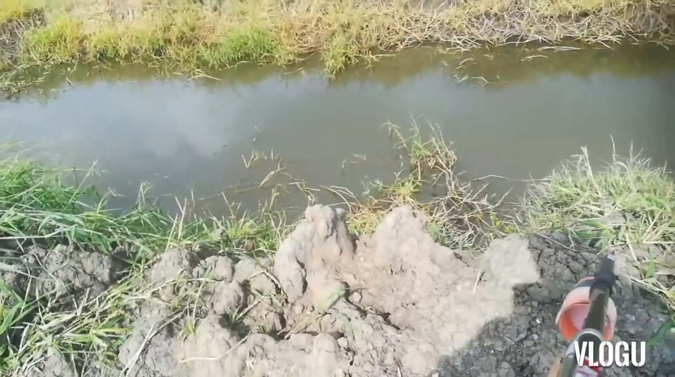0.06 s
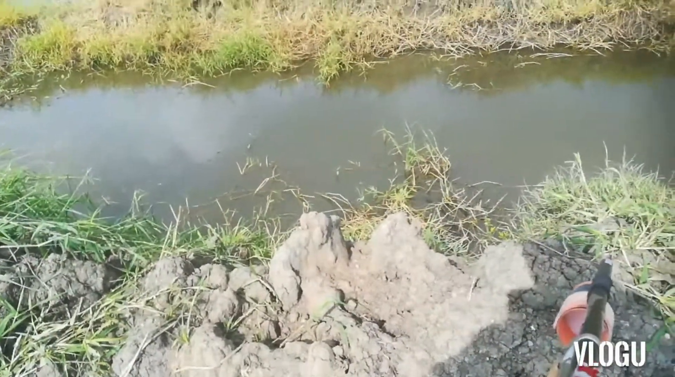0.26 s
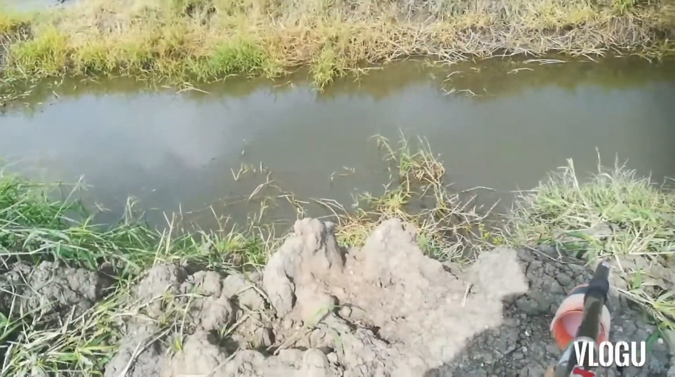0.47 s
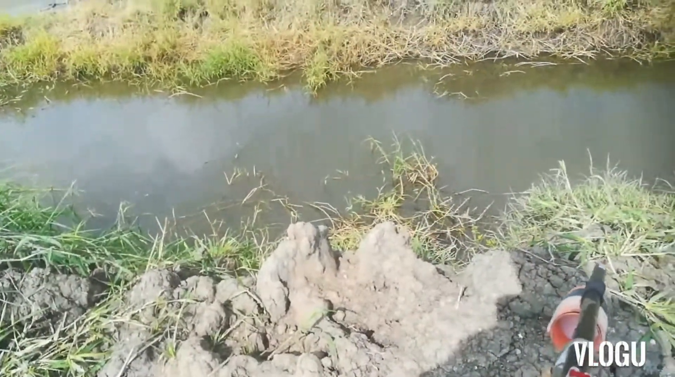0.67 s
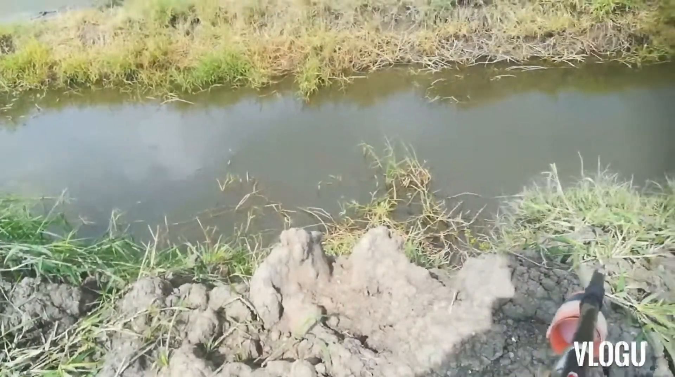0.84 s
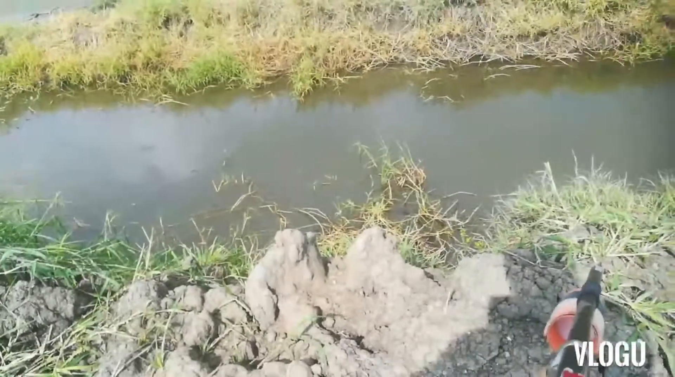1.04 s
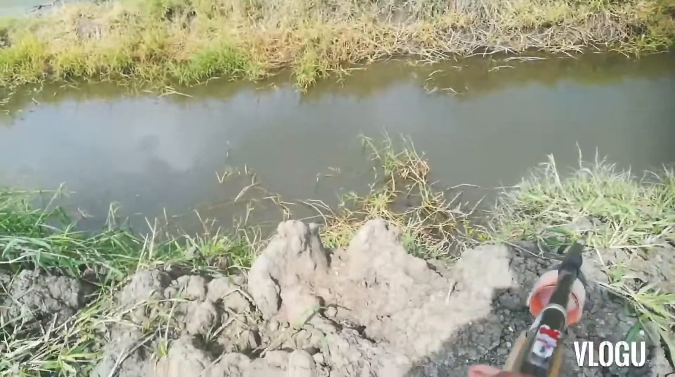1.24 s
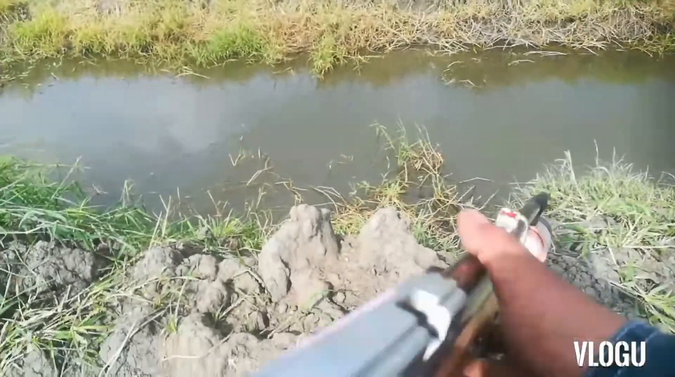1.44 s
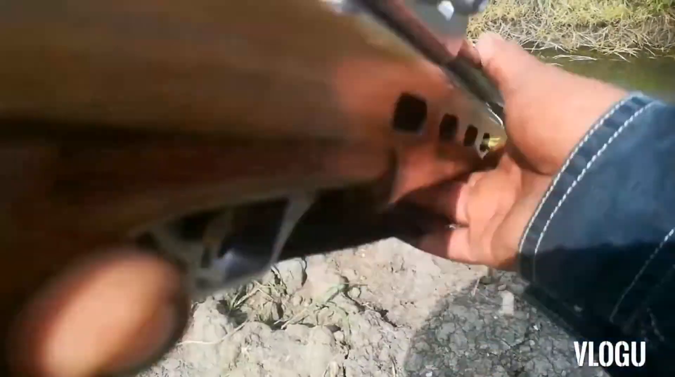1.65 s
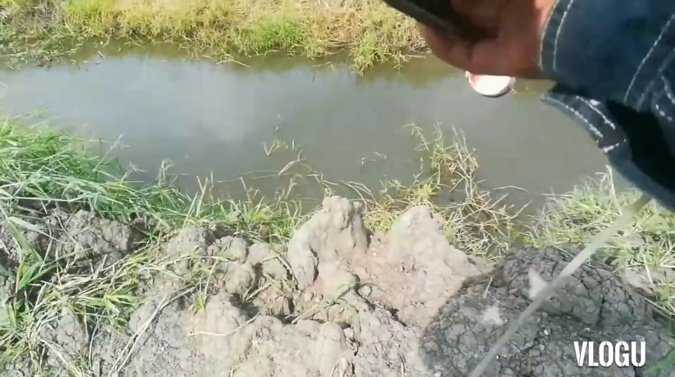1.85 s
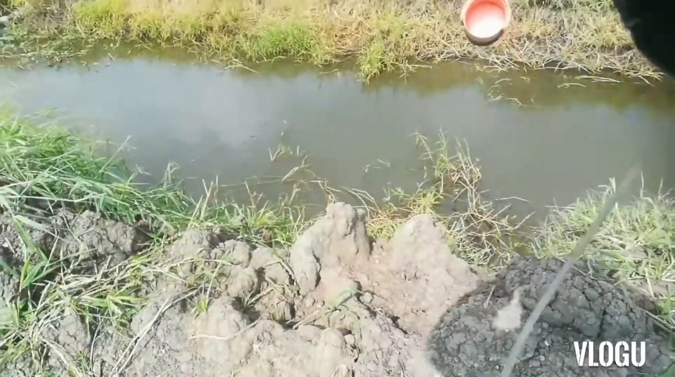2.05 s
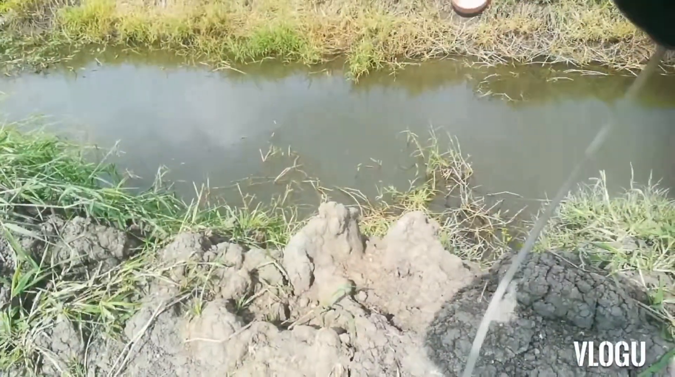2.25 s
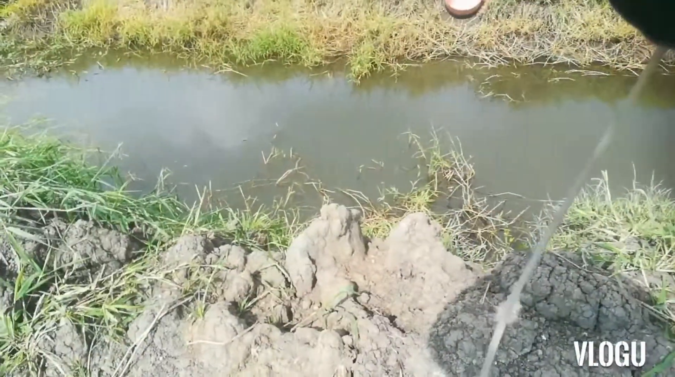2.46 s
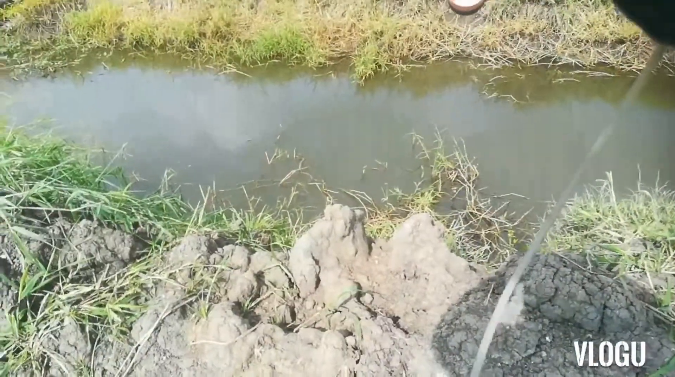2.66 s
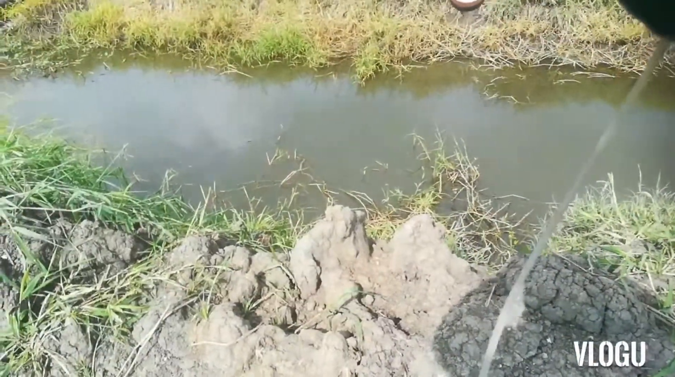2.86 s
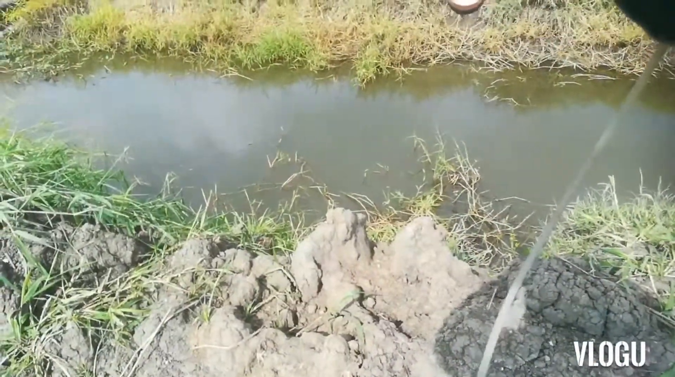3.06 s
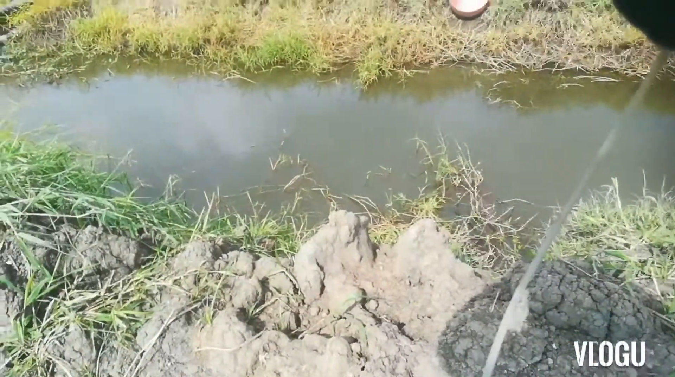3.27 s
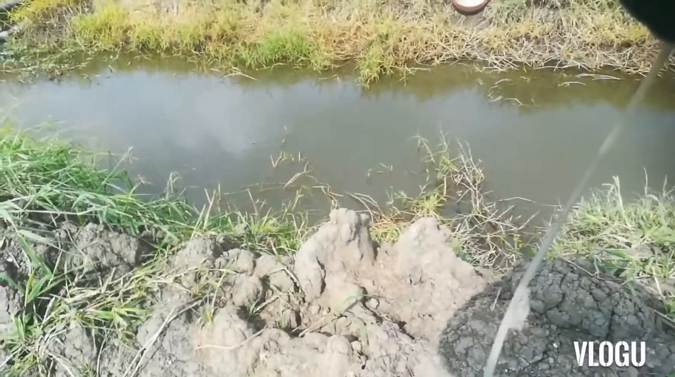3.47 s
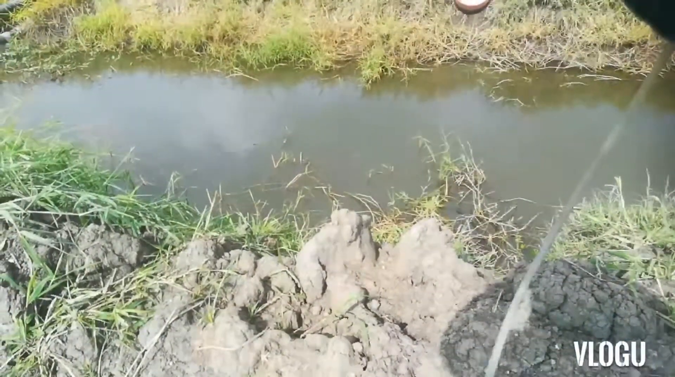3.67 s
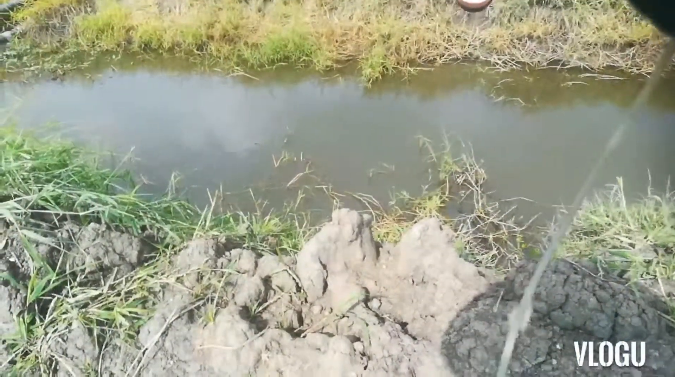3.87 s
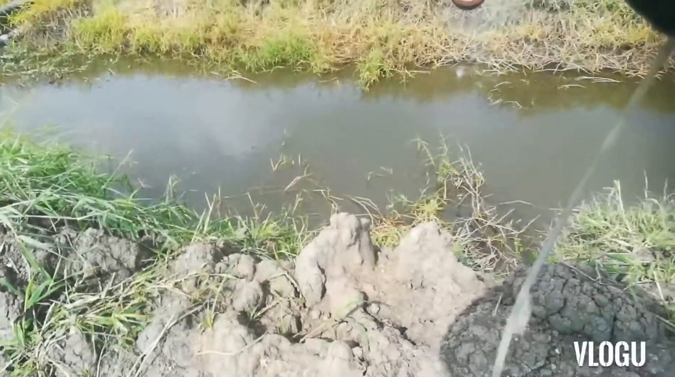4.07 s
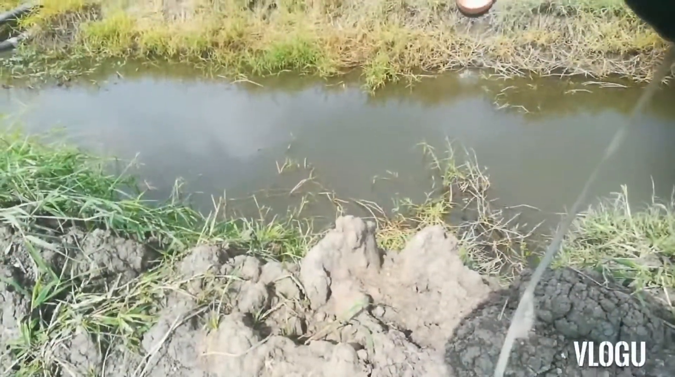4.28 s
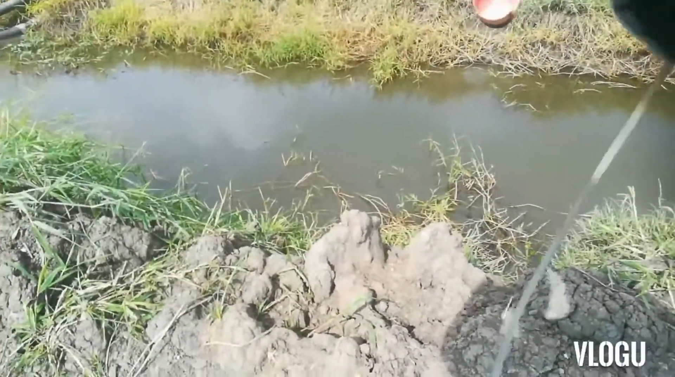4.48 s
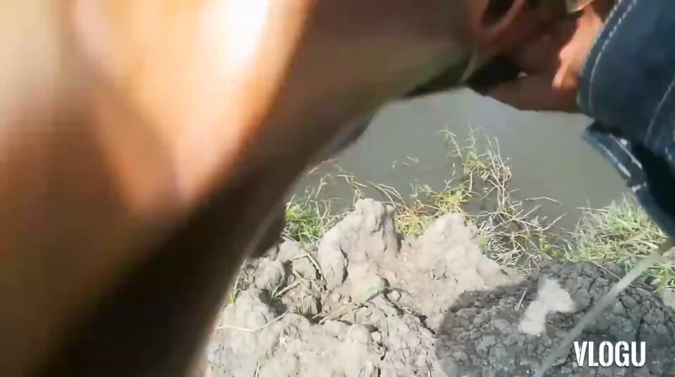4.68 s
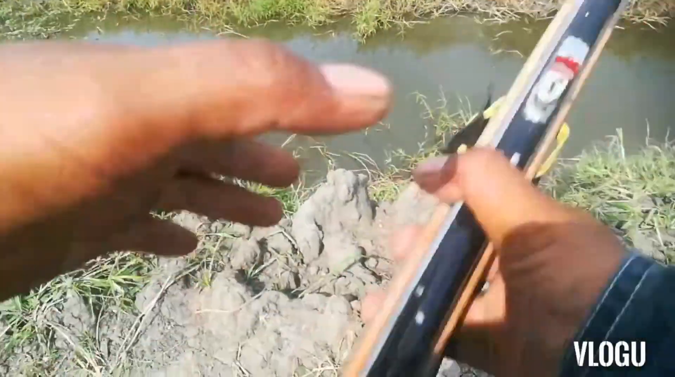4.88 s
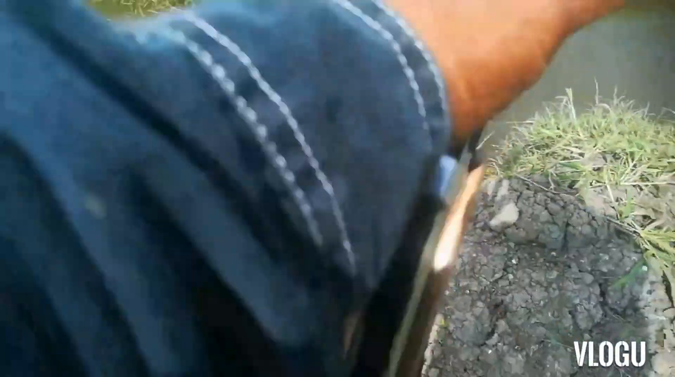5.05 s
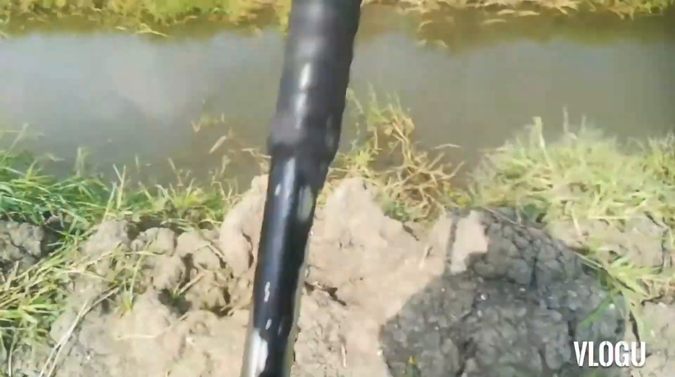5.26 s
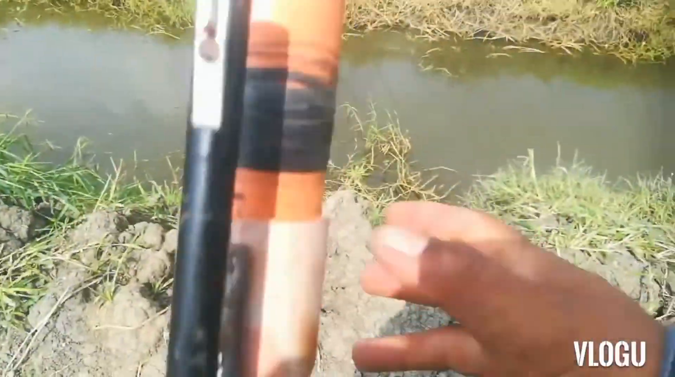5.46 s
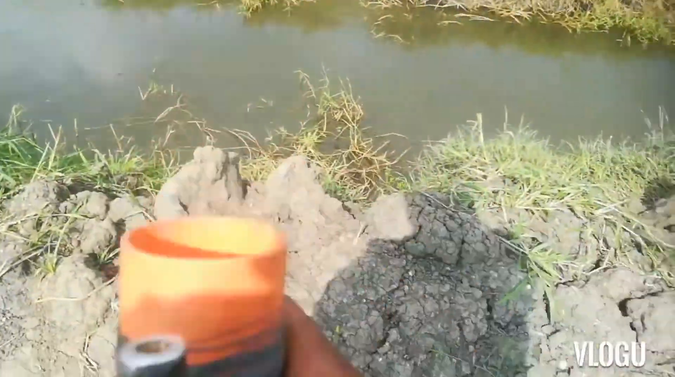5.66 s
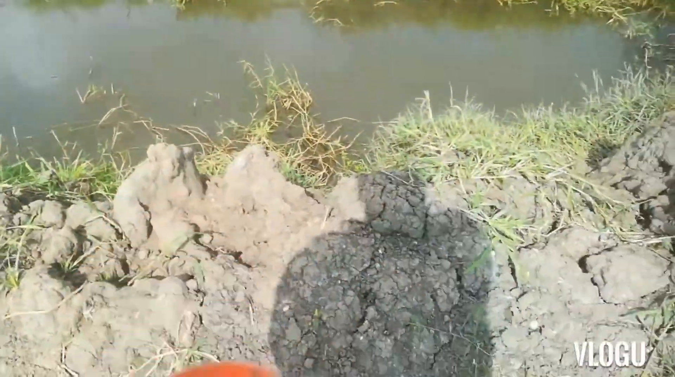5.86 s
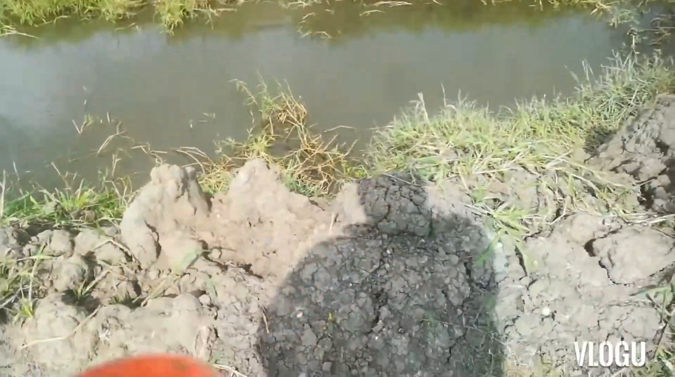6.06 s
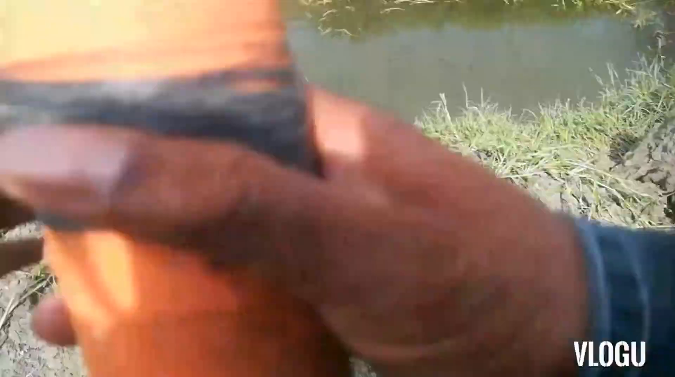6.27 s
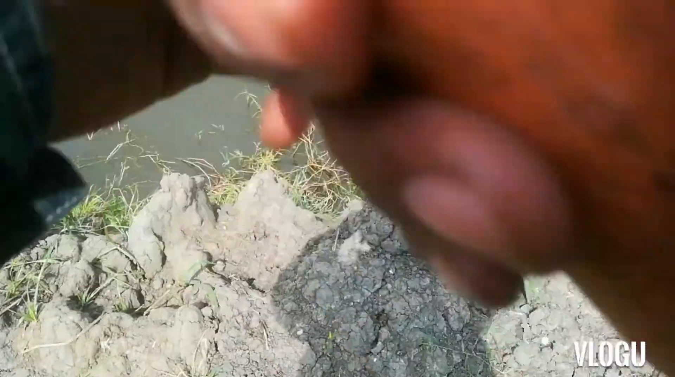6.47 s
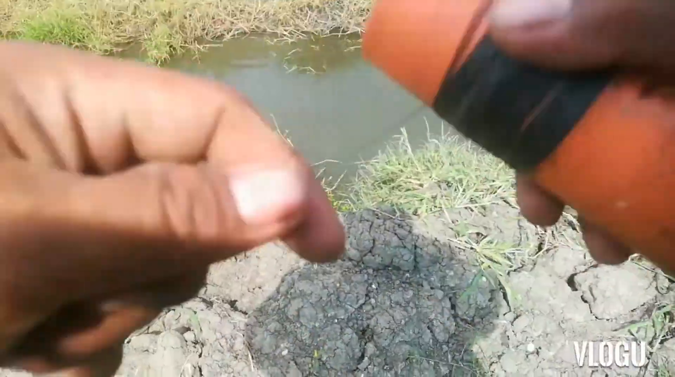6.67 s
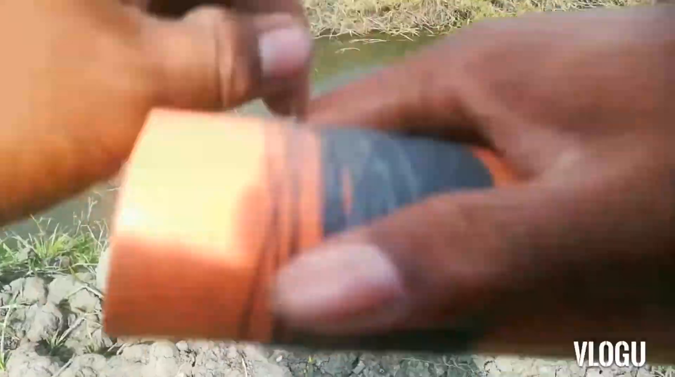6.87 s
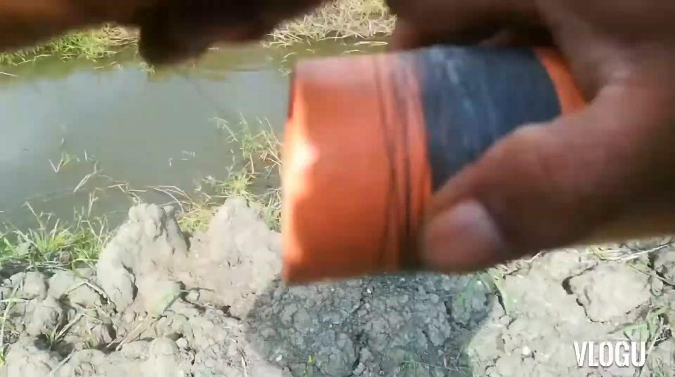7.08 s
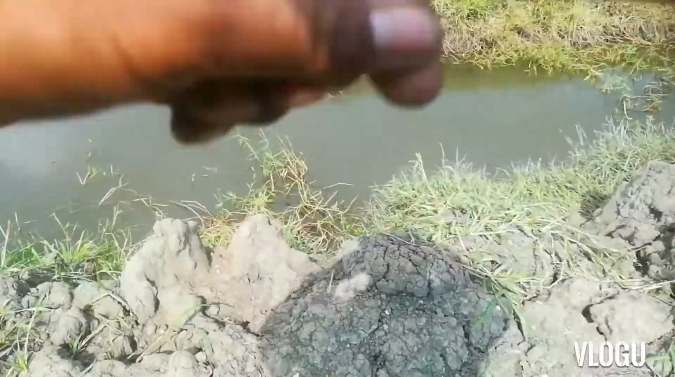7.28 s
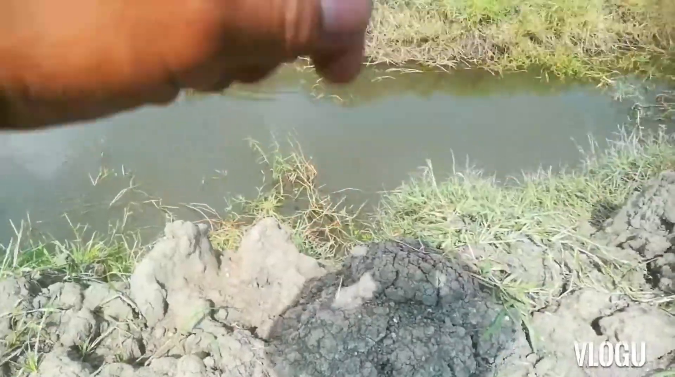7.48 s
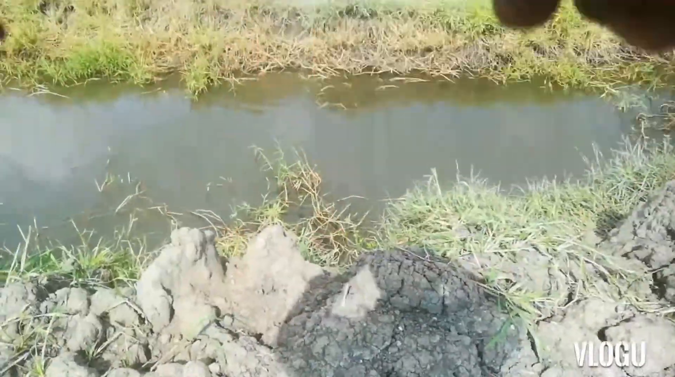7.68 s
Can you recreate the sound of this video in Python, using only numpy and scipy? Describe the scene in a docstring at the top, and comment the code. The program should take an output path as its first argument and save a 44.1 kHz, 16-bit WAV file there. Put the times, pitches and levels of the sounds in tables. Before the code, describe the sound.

Over a steady far engine hum and wind bumps, a rubber-powered fishing gun fires with one violent snap, then a latch click and hollow plastic knock.

```python
"""The bank of a ditch in open country, where a rubber-powered fishing gun is fired near a microphone.
Far pump engines hum (a harmonic sum) and chatter (pulsed resonant noise); wind bumps the microphone.
Sleeves rustle as shaped noise, an insect trills by pulsed tones and a bird whistles as narrow noise.
The shot is a series of dying crackles that excite the stock, with line fizzing off its spool;
afterwards hands knock and rub the plastic spool, heard as struck modes, short squeaks and strokes."""
import sys
import numpy as np
from scipy import signal
from scipy.fft import rfft, irfft, next_fast_len
from scipy.io import wavfile
from scipy.ndimage import uniform_filter1d

SR = 44100
rng = np.random.default_rng(int(sys.argv[2]) if len(sys.argv) > 2 else 0)


def put_to_file(sound):
    """Save the sound as 16-bit audio at rate SR, in the file named by the first command-line argument."""
    columns = np.atleast_2d(sound).T  # one column per channel
    safe = np.clip(columns, -1, 1)
    whole_steps = np.round(safe * 32767)
    wavfile.write(sys.argv[1], SR, whole_steps.astype(np.int16))


N = 340802  # length in samples


def amp(db):
    """Amplitude ratio of a level in decibels."""
    return 10 ** (np.asarray(db) / 20)


def evened(x):
    """Normalisation to unit rms."""
    return x / np.sqrt(np.mean(x ** 2) + 1e-20)


def follow(rows, column=1):
    """Linear interpolation of one column against time, at every sample."""
    rows = np.array(rows)
    return np.interp(np.arange(N) / SR, rows[:, 0], rows[:, column])


def colour(points, hz):
    """Spectral envelope in dB: straight lines on a logarithmic frequency axis."""
    f, db = np.transpose(points)
    return np.interp(np.log(hz + 1), np.log(f + 1), db, left=-90, right=-90)


def tinted(x, points):
    """Spectral shaping by multiplication in the frequency domain, to unit rms."""
    size = next_fast_len(len(x))
    gain = amp(colour(points, np.fft.rfftfreq(size, 1 / SR)))
    return evened(irfft(rfft(x, size) * gain, size)[:len(x)])


def drift(rate_hz):
    """Slow random modulation: chance values at the given rate joined by lines, unit rms."""
    return evened(np.interp(np.arange(N) * rate_hz / SR, np.arange(4000), rng.standard_normal(4000)))


def resonate(x, hz, width_hz):
    """Resonance by heterodyne: hz is shifted to zero, smoothed and shifted back, with unit peak gain."""
    turn = np.exp(2j * np.pi * np.cumsum(hz * np.ones(len(x))) / SR)
    r = np.exp(-np.pi * width_hz / SR)
    return 2 * (turn * signal.lfilter([1 - r], [1, -r], x / turn)).real


def add(mix, s, sound):
    """Superposition of a sound on the mix from time s."""
    part = mix[round(s * SR):][:len(sound)]
    part += sound[:len(part)]


def swells(rows, column, order):
    """Power sum of envelopes 20 dB down one rise before and one fall after the peak (1 pointed, 2 round)."""
    t, power = np.arange(0, N + 64, 64) / SR, 0
    for row in rows:
        before = (row[0] - t) / max(row[1], .005)
        after = (t - row[0]) / max(row[2], .005)
        away = np.where(t < row[0], before, after)
        power = power + amp(row[column] - 20 * np.minimum(away, 5) ** order) ** 2
    return np.interp(np.arange(N) / SR, t, np.sqrt(power))


def struck(points, peak_db, t60, bright_db=0):
    """Modal synthesis: of a dense crowd of modes the high ones rise fastest and die first."""
    t = np.arange(6000) / SR
    chance = rng.random((90, 2))  # mistuning and phase of each mode
    hz = (np.geomspace(170, 15000, 90) * (0.977 + 0.053 * chance[:, 0]))[:, None]
    # Modes are spaced evenly in log frequency, so each gathers power in proportion to hz.
    db = colour(points, hz) + 10 * np.log10(hz) + bright_db * np.log2(hz / 2000)
    rings = np.clip(t60 * (1000 / hz) ** 0.54, .003, 1)
    rise = np.minimum(t * hz / 2.1, 1)
    envelope = rise * amp(db - 60 * t / rings) / np.sqrt(rings)
    ring = (envelope * np.sin(2 * np.pi * (hz * t + chance[:, 1:]))).sum(0)
    return amp(peak_db) * ring / abs(ring).max()


def air():
    """Broadband noise that swells a little, beside resonant chatter modulated in short even puffs."""
    # Hiss of the open field. Each row: frequency in Hz, relative density in dB per Hz.
    hiss_colour = [(180, -27.5), (300, 1), (360, -2), (486, -6), (667, -12), (725, -11), (1250, -11.5),
                   (1430, -9.5), (1560, -15), (1900, -13), (3290, -13.5), (3830, -12), (5900, -19.5),
                   (8790, -18), (10500, -24), (16000, -27.5)]
    # Low rumble. Each row: frequency in Hz, relative density in dB per Hz.
    rumble_colour = [(15, -12), (30, -4.5), (60, -3), (100, 1.5), (150, -5.5), (220, -15), (320, -23),
                     (500, -30.5)]
    # Valve chatter of a second small engine. Each row: centre in Hz, width of each pass in Hz, level in dB.
    chatter_bands = [(1503, 140, -75), (1830, 470, -72), (2880, 560, -77), (3730, 700, -73.5),
                     (4650, 680, -75)]
    hiss_db, rumble_db, puffs_per_s = -62.5, -48.5, 16.7
    hiss_swell = amp(hiss_db + 0.54 * drift(3) + 0.86 * drift(40))
    hiss = hiss_swell * tinted(rng.standard_normal(N), hiss_colour)
    turns = puffs_per_s * np.arange(N) / SR
    puffs = evened((.25 + np.exp(-(turns % 1) / .3)) * amp(1.4 * drift(23)))
    noise = rng.standard_normal(N) * puffs
    chatter = sum(amp(db) * evened(resonate(resonate(noise, hz, width), hz, width))
                  for hz, width, db in chatter_bands)
    rumble = amp(rumble_db + 1.2 * drift(6)) * tinted(rng.standard_normal(N), rumble_colour)
    return hiss + chatter + rumble


def engine():
    """Harmonic sum over the orders of a steady engine; each wavers as the air between drifts."""
    # Engine orders. Each row: multiple of the firing rate, relative level in dB.
    orders = [(0.5, -29), (1, -16), (1.5, -25), (2, -4), (2.5, -20), (3, 1), (3.5, -21), (4, -8),
              (4.5, -20.5), (5, -27), (5.5, -20), (6, -11.5), (6.5, -30), (7, -28), (7.5, -22), (8, -30.5),
              (8.5, -35), (9, -28)]
    firings_hz, level_db, waver_db = 30.2, -42, 1.3
    turns = np.cumsum(firings_hz * (1 + 0.00298 * drift(1.5))) / SR
    tones = [amp(db + waver_db * drift(3.2)) * np.cos(2 * np.pi * k * (turns + .02 * k)) for k, db in orders]
    return amp(level_db) * evened(sum(tones))


def wind():
    """Turbulent pressure as low noise in two registers: a swaying calm with gusts added in power."""
    # Gusts and jolts at the microphone. Each row: peak, rise and fall in seconds, low level in dB,
    # flutter level in dB.
    gusts = [(.33, .08, 0.056, -30.5, -50), (.52, 0.098, 0.13, -35, -58), (.84, 0.043, .2, -42, -63),
             (1.29, 0.026, 0.036, -27, -45), (1.4, .08, .1, -39, -56), (1.56, .15, .06, -33.5, -38),
             (2.045, 0.036, 0.044, -33, -61), (2.32, .2, .3, -58, -59), (2.9, .3, .1, -50, -59),
             (3.42, .1, .3, -47, -58), (3.69, .3, 0.12, -38.5, -42), (4.12, .02, 0.05, -29, -35),
             (4.37, 0.097, 0.075, -52, -54), (4.84, .06, .1, -47.5, -40.5), (4.95, .08, 0.083, -32, -36.5),
             (5.3, 0.19, .1, -38, -49), (5.74, .3, .06, -30.5, -48), (5.86, 0.076, .1, -44.5, -35.5),
             (6.0, 0.086, 0.11, -38.5, -28.5), (6.2, 0.059, 0.098, -30, -52), (6.45, .25, .06, -33.5, -52),
             (6.54, 0.094, 0.052, -33.5, -33), (6.76, 0.13, 0.095, -39.5, -51.5),
             (6.83, 0.087, .1, -40, -38.5), (7.01, .1, 0.062, -45, -50), (7.24, .3, .2, -47.5, -53.5),
             (7.73, .08, .1, -41, -52.5)]
    # Low register. Each row: frequency in Hz, relative density in dB per Hz.
    low_colour = [(10, -4), (30, 0.5), (60, -2), (120, -14.5), (300, -43.5)]
    # Flutter register. Each row: frequency in Hz, relative density in dB per Hz.
    flutter_colour = [(40, -18.5), (55, 0), (90, -1), (140, -12.5), (300, -31.5)]
    low_calm_db, flutter_calm_db, sway_db = -59, -60.5, 3.5
    out = np.zeros(N)
    for column, points, calm_db in ((3, low_colour, low_calm_db), (4, flutter_colour, flutter_calm_db)):
        lumps = tinted(rng.standard_normal(N), points)
        lumps /= np.sqrt(uniform_filter1d(lumps ** 2, size=2000) + 0.063)  # evens out the local power
        calm = amp(calm_db + sway_db * drift(12))
        out += np.hypot(calm, swells(gusts, column, order=1)) * lumps
    return out


def trills():
    """Amplitude modulation: even wing strokes gate a tone that climbs, then sags."""
    # Insect trills. Each row: peak, rise and fall in seconds, level in dB, pitch at the peak in Hz.
    calls = [(3.305, .11, .1, -55, 3610), (3.98, .14, .13, -53, 3643)]
    strokes_per_s, climb_hz_per_s, sag_hz = 65, 700, 1100
    blur = .018  # rms pitch wobble, as a fraction
    out = np.zeros(N)
    for s, rise, fall, level_db, hz in calls:
        t = np.arange(-1.3 * rise, 1.3 * fall, 1 / SR)
        strokes = np.sin(np.pi * strokes_per_s * t) ** 2
        wobble = 1 + blur * evened(uniform_filter1d(rng.standard_normal(20000), size=40))[:len(t)]
        pitch = hz + climb_hz_per_s * np.minimum(t, 0) - sag_hz * (np.maximum(t, 0) / fall) ** 2.5
        swell_db = level_db - 20 * np.where(t < 0, t / rise, t / fall) ** 2
        tone = np.sin(2 * np.pi * np.cumsum(pitch * wobble) / SR)
        add(out, s + t[0], amp(swell_db) * strokes * tone)
    return out


def bird():
    """Narrow-band noise about a falling centre: a whistle blurred by distance."""
    # A far call sliding down. Each row: time in seconds, level in dB, pitch in Hz.
    slide = [(2.72, -87, 2129), (2.8, -73, 2088), (2.95, -72, 1950), (3.1, -76, 1840), (3.2, -85, 1766)]
    hz = follow(slide, column=2)
    return amp(follow(slide)) * evened(resonate(resonate(rng.standard_normal(N), hz, 90), hz, 90))


def rubs():
    """Friction noise: dense fibre slips give a grainy hiss, a fuzzy whistle, a fizz and a dull part."""
    # Strokes of cloth and skin. Each row: peak, rise and fall in seconds, levels of hiss, dull part and
    # fizz in dB, whistle pitch in Hz, whistle level in dB.
    strokes = [(1.42, 0.22, .2, -70, -62.5, -75, 4350, -77),
               (1.55, 0.15, .24, -58, -57.5, -62.5, 4630, -68),
               (1.72, 0.11, 0.11, -57, -56.5, -64.5, 4720, -55),
               (1.82, 0.15, .11, -53.5, -56.5, -58.5, 4550, -55),
               (1.915, 0.065, 0.084, -50, -59.5, -60, 4600, -59),
               (2.01, 0.11, 0.14, -62.5, -61, -68, 4400, -69),
               (2.11, 0.069, .09, -58.5, -66.5, -64.5, 4450, -67),
               (2.28, .12, 0.27, -68, -72, -80, 4130, -71), (4.775, 0.11, .09, -57, -60, -63, 4600, -64),
               (4.85, .06, 0.061, -59.5, -56.5, -64, 4450, -66),
               (4.92, .05, 0.14, -66.5, -59.5, -71, 4400, -69),
               (5.24, 0.065, 0.12, -66, -53, -63, 3950, -70),
               (5.32, 0.091, 0.11, -59, -53, -59.5, 4140, -65),
               (5.42, .13, 0.13, -62, -55.5, -68.5, 4000, -65),
               (5.52, 0.091, 0.15, -62, -56.5, -70, 4170, -65),
               (5.77, .2, 0.28, -65.5, -61, -64.5, 4250, -70), (6.05, 0.23, 0.14, -65, -58, -68, 4200, -69),
               (6.245, 0.074, 0.1, -44, -46, -41, 4400, -43), (6.33, 0.044, .11, -58, -48, -60, 4500, -62),
               (6.49, 0.15, 0.19, -63, -50.5, -68, 3930, -65),
               (6.66, .12, 0.21, -70.5, -60.5, -71, 4250, -74.5),
               (6.84, .15, 0.16, -70.5, -63, -71.5, 4300, -75),
               (7.05, 0.11, 0.12, -66, -63, -66.5, 4280, -70),
               (7.23, 0.079, 0.16, -72, -72, -69.5, 4340, -73), (7.43, .15, .1, -74, -68.5, -68, 4250, -81),
               (7.6, .12, .3, -75, -67.5, -69.5, 4250, -79)]
    # Hiss of cloth. Each row: frequency in Hz, relative density in dB per Hz.
    hiss_colour = [(1800, -15), (2500, -6), (3300, -7.5), (4500, -1), (5800, -5.5), (6800, -20),
                   (9000, -35.5)]
    # Dull part. Each row: frequency in Hz, relative density in dB per Hz.
    dull_colour = [(150, -26), (250, 1.5), (600, -6), (1050, -4), (1500, -6), (1900, -9.5), (2400, -24)]
    # Fizz. Each row: frequency in Hz, relative density in dB per Hz.
    fizz_colour = [(5000, -32), (6500, 2.5), (7800, 3), (9000, -6.5), (11000, -14.5), (16000, -24)]
    width_hz = 570  # of each whistle resonance pass
    slips = [rng.standard_normal(N) * amp(1.85 * drift(500) + 2.26 * drift(50)) for _ in range(4)]
    hz = follow(strokes, column=6)
    tone = evened(resonate(resonate(slips[3], hz, width_hz), hz, width_hz))
    hiss, dull, fizz, whistle = (swells(strokes, k, order=2) for k in (3, 4, 5, 7))
    out = hiss * tinted(slips[0], hiss_colour) + whistle * tone
    return out + dull * tinted(slips[1], dull_colour) + fizz * tinted(slips[2], fizz_colour)


def ringing(modes):
    """Free vibration: a sum of exponentially decaying sines that takes 1.5 ms to start."""
    t = np.arange(8000) / SR
    tones = sum(amp(db - 60 * t / t60) * np.sin(2 * np.pi * hz * t) for hz, db, t60 in modes)
    return tones * np.minimum(t / .0015, 1)


def handling():
    """Impact and friction: latch, spool and finger ticks ring as modes, line squeaks on plastic."""
    # Latch blow. One row: start in seconds, peak in dB, t60 in seconds at 1 kHz.
    latch_hit = (5.2874, -9.5, 0.019)
    # Latch colour. Each row: frequency in Hz, relative density in dB per Hz.
    latch_colour = [(88, -32), (150, -4), (315, -2.5), (524, -14), (759, -8), (998, -5), (1390, -9),
                    (2760, -18), (3770, -10.5), (5250, -14), (5680, -30), (7920, -12), (16000, -61)]
    # Metal catch and stock. Each row: frequency in Hz, level in dB, t60 in seconds.
    catch_modes = [(241, -30, 0.032), (322, -17, 0.021), (745, -19, 0.025), (1060, -22, .018),
                   (1366, -11, .016), (2245, -23, 0.014)]
    # One hard knock on the spool, then taps. Each row: start in seconds, peak in dB, t60 in seconds
    # at 1 kHz, brightness in dB per octave, gain of the tube ring in dB.
    spool_hits = [(6.311, -8, 0.042, 0, 0), (6.383, -25, .022, -6, -24), (6.462, -24, .022, -4, -24)]
    # Spool colour. Each row: frequency in Hz, relative density in dB per Hz.
    spool_colour = [(88, -34), (150, -8), (341, -1.5), (578, -28), (1060, -2.5), (1340, -17), (2450, -17),
                    (2760, -14), (3040, -29), (4240, -6), (5460, -22), (9080, -15.5), (16000, -58)]
    # Air and wall of the spool. Each row: frequency in Hz, level in dB before the gain, t60 in seconds.
    tube_modes = [(244.6, -22.5, 0.21), (1080, -13, 0.045), (815, -25.5, 0.042), (2120, -26, 0.017),
                  (4180, -21, 0.015)]
    # Small ticks. Each row: start in seconds, peak in dB, t60 in seconds at 1 kHz,
    # brightness in dB per octave.
    ticks = [(1.268, -51, 0.033, -5), (1.637, -41.5, 0.03, 0.5), (1.896, -40, 0.03, 1),
             (4.826, -37.5, 0.03, 0), (4.929, -40, 0.03, 4), (5.005, -39, 0.033, 8),
             (5.199, -39.5, 0.028, 0.5), (5.224, -36, 0.047, 6), (5.233, -35.5, 0.044, -3),
             (5.404, -45, 0.028, -3), (5.445, -32, 0.031, 3), (6.017, -34, 0.04, -1), (6.044, -48, 0.03, 2),
             (6.149, -41, 0.037, 2), (6.178, -43, 0.025, 1.5), (6.803, -47.5, 0.03, 5),
             (6.971, -46, 0.028, 3.5), (7.439, -51.5, 0.027, 6.5)]
    # Tick colour. Each row: frequency in Hz, relative density in dB per Hz.
    tick_colour = [(170, -20), (400, -3), (900, 2), (2200, -3), (4200, -7.5), (8000, -17.5), (12000, -27),
                   (16000, -36)]
    # Narrow squeaks and swishes. Each row: start in seconds, level in dB, centre in Hz,
    # length in seconds, width of each pass in Hz.
    squeaks = [(1.313, -65, 6600, .02, 300), (1.749, -50.5, 5700, 0.17, 900),
               (4.279, -49, 3060, 0.021, 700), (4.288, -55, 910, 0.04, 500),
               (4.758, -54, 2830, 0.074, 1200), (6.006, -51.5, 1480, 0.054, 300),
               (6.48, -63, 2490, 0.063, 300), (6.464, -61.5, 3980, 0.15, 550),
               (6.178, -44.5, 1250, 0.14, 600), (1.63, -52, 4650, 0.11, 300),
               (4.933, -53, 5700, 0.017, 397), (4.951, -52.5, 7040, 0.011, 500),
               (4.96, -63, 11500, .012, 400), (5.076, -39.5, 8000, 0.0057, 1186),
               (5.338, -49.5, 8100, .012, 700), (5.352, -46, 8050, 0.0091, 500),
               (5.527, -59, 14900, .03, 700), (5.612, -55, 8100, 0.064, 500),
               (5.949, -54.5, 8130, 0.083, 600), (6.147, -40, 4950, 0.0063, 500),
               (6.989, -65.5, 4300, 0.084, 350), (7.19, -65, 4300, 0.063, 350),
               (5.359, -49, 3800, .006, 900), (6.675, -59, 6600, .005, 1204),
               (7.302, -50, 7800, 0.0048, 2500), (4.333, -57.5, 2600, .04, 400),
               (6.19, -47, 4500, .11, 500)]
    out, t = np.zeros(N), np.arange(8000) / SR
    tube = ringing(tube_modes)
    add(out, latch_hit[0], struck(latch_colour, *latch_hit[1:]))
    add(out, latch_hit[0] + .001, ringing(catch_modes))  # the catch lands 1 ms after the first click
    for s, peak_db, t60, bright_db, tube_db in spool_hits:
        add(out, s, struck(spool_colour, peak_db, t60, bright_db))
        add(out, s, amp(tube_db) * tube)
    for s, peak_db, t60, bright_db in ticks:
        add(out, s, struck(tick_colour, peak_db, t60, bright_db))
    for s, level_db, hz, length, width_hz in squeaks:
        noise = rng.standard_normal(len(t))
        fuzzy = evened(resonate(resonate(noise, hz, width_hz), hz, width_hz))
        add(out, s, amp(level_db) * fuzzy * np.sin(np.pi * np.clip(t / length, 0, 1)))
    return out


def line():
    """Noise under two envelopes: line flutters as it whips off the spool, its fizz dying before its body."""
    # Running line. Each row: time in seconds, body level in dB, fizz level in dB.
    run = [(4.14, -59, -45), (4.15, -55, -62), (4.204, -43.5, -52), (4.302, -55, -69), (4.4, -66, -80),
           (4.55, -77, -91.5)]
    # Body. Each row: frequency in Hz, relative density in dB per Hz.
    body_colour = [(300, -20.5), (1000, -5.5), (2000, -6), (4000, -4.5), (8000, -5.5), (10000, -21)]
    # Fizz. Each row: frequency in Hz, relative density in dB per Hz.
    fizz_colour = [(7000, -23.5), (9000, 0), (13500, -3.5), (16000, -9)]
    t = np.arange(N) / SR
    running = (t > run[0][0]) * (t < run[-1][0]) * amp(2.5 * drift(120))
    body = amp(follow(run)) * tinted(rng.standard_normal(N), body_colour)
    fizz = amp(follow(run, column=2)) * tinted(rng.standard_normal(N), fizz_colour)
    return running * (body + fizz)


def shot():
    """Forced resonance: each slap is an exponentially dying crackle that also shakes the stock."""
    # Trigger, rubbers slapping the stock, dart and line. Each row: start in seconds, nominal peak in dB
    # (7 dB above the starting rms), t60 in seconds (at least 5 ms), brightness in dB per octave.
    slaps = [(4.1015, -4, .014, 0), (4.105, -12, .03, 1), (4.1084, 2.5, 0.039, -0.5),
             (4.1146, -5, 0.022, -2), (4.123, 4, 0.016, 2), (4.1269, -6.5, .045, 0.5),
             (4.136, -28, 0.16, 6), (4.162, -25.5, 0.11, -4), (4.168, -27, 0.13, 3.5),
             (4.175, -33, 0.08, -2), (4.221, -22, 0.02, -6), (4.331, -29, 0.04, -8),
             (4.345, -38, 0.077, -9)]
    # Crackle. Each row: frequency in Hz, relative density in dB per Hz.
    crackle_colour = [(35, -36.5), (60, -8.5), (330, -3), (527, -11), (1510, -5), (1820, -7.5), (2000, -5),
                      (2710, -9), (3580, -6.5), (6000, -9.5), (7750, -10), (13600, -25), (16000, -29)]
    # Resonances of the stock. Each row: frequency in Hz, width in Hz, gain in dB.
    stock = [(1530, 135, 0), (2000, 300, -3), (3260, 300, -5), (3600, 150, -3.5), (6950, 200, -4.5),
             (7570, 250, -1), (8050, 110, -9)]
    grain_db, attack_s = 2, 0.00065  # unevenness of the crackle, onset
    out, t = np.zeros(N), np.arange(12000) / SR
    hz = np.fft.rfftfreq(len(t), 1 / SR)
    for s, peak_db, t60, bright_db in slaps:
        tilt_db = colour(crackle_colour, hz) + bright_db * np.log2((hz + 500) / 2000)
        noise = rng.standard_normal(len(t))
        unevenness = evened(uniform_filter1d(rng.standard_normal(len(t)), size=30))
        grains = noise * amp(grain_db * unevenness)
        crackle = evened(irfft(rfft(grains) * amp(tilt_db)))
        decay = amp(peak_db - 7 - 60 * t / max(t60, .005))
        add(out, s, decay * crackle * np.minimum(t / attack_s, 1))
    start = slaps[0][0]
    blows = out[round(start * SR):][:SR]
    add(out, start, sum(amp(db) * resonate(blows, f, width) for f, width, db in stock))
    return out


def scene():
    """Linear superposition of all sources at one microphone."""
    return (engine() + air() + wind() + rubs() + trills() + bird() + shot() + line() + handling())[None]


def record(dry):
    """Dynamic compression: gain ducks after loud blows, peaks clip, then a low-pass limits the band."""
    release_db_per_s, threshold_db, edge_hz = 19.0, -16.0, 15900
    power_db = 10 * np.log10(abs(uniform_filter1d(dry[0] ** 2, size=400)) + 1e-12)
    fall = np.arange(N) * release_db_per_s / SR
    held_db = np.maximum.accumulate(power_db + fall) - fall  # jumps up with peaks, falls steadily
    over_db = np.maximum(held_db - threshold_db, 0)
    late_db = signal.lfilter(np.ones(1500) / 1500, 1, over_db)  # trailing mean over 34 ms
    clipped = np.clip(dry / amp(0.4 * late_db), -.72, .72)
    low_pass = signal.firwin(511, edge_hz, window=("kaiser", 9), fs=SR)
    return signal.oaconvolve(clipped, low_pass[None], "same")


dry = scene()
out = record(dry)
put_to_file(out)
```